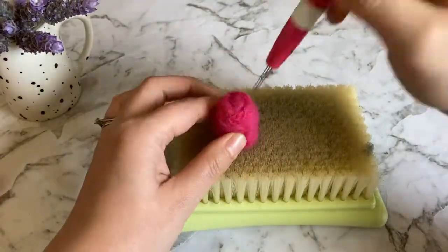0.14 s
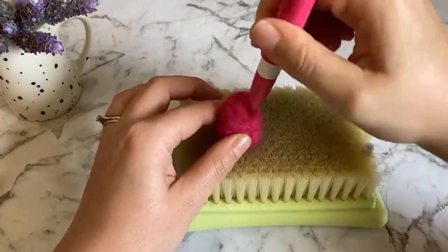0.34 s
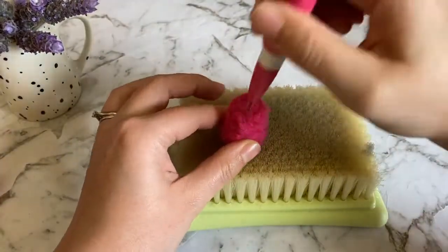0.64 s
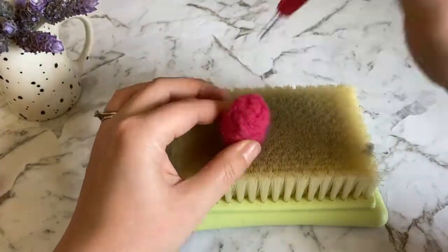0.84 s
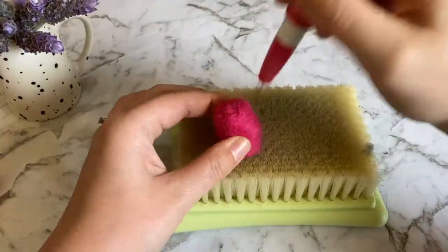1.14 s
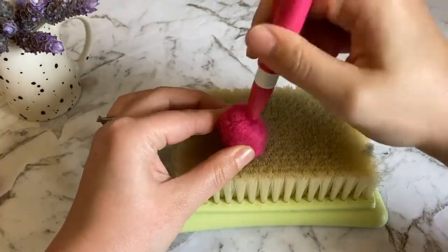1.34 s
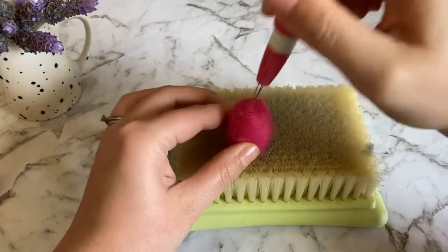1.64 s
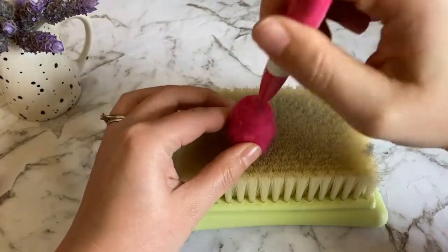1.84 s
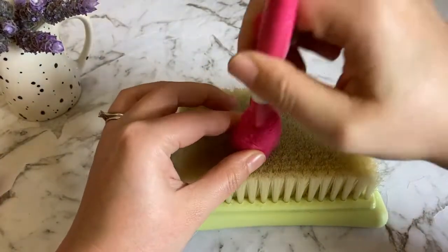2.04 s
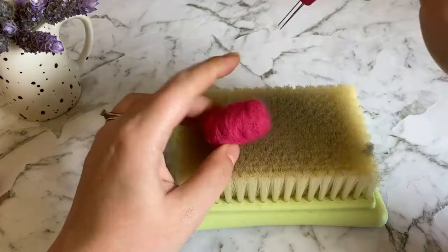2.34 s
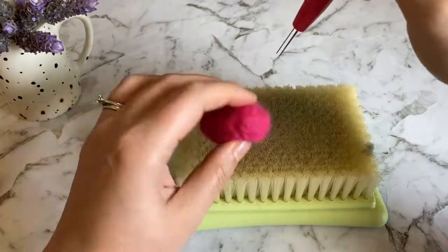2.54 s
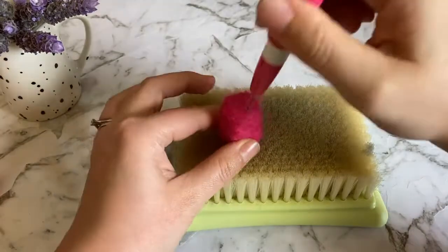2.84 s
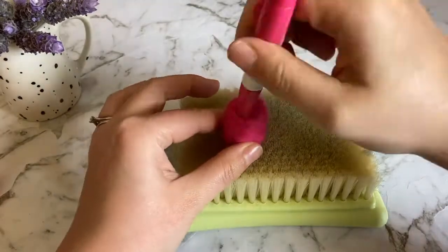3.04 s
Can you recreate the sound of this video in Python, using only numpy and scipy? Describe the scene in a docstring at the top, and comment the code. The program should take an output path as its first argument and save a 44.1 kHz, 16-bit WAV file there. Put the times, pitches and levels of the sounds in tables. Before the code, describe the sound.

Felting needles stab rapidly and evenly into a wool roll on a bristle mat, in three runs

```python
"""Fingers turn a roll of wool on a bristle mat with small rasps, and an arm leans on the table.
Then felting needles stab the roll about eleven times a second, in three runs with fingers between.
Each stab rasps through the fibres, rings the mat's modes and rocks the table; the withdrawal crackles.
Barbs tick as they let go, brushing swishes softly, and between the runs the table is knocked.
A close microphone feeds the left channel, over a wavering floor of noise and low table shaking."""
import sys
import numpy as np
from scipy import signal
from scipy.fft import rfft, irfft
from scipy.io import wavfile

SR = 44100
rng = np.random.default_rng(int(sys.argv[2]) if len(sys.argv) > 2 else 0)


def voltage_ratio(level):
    """Linear amplitude factor for a level in decibels (scalar or array-like)."""
    return 10 ** (np.asarray(level, float) / 20)


def store_wav(level_fs):
    """Save 16-bit WAV to argv[1]."""
    pcm = np.round(np.clip(np.atleast_2d(level_fs), -1, 1) * 32767)
    wavfile.write(sys.argv[1], SR, pcm.T.astype(np.int16))


N = 141120   # 3.2 s

# Levels in dB are those ahead of the microphone gain.
# Stabs of the needles. Each row: start in seconds, length in seconds, rasp level in dB, mat level in dB,
# crunch level in dB, share of the stroke at which the mat takes the push (0-1).
STROKES = [(0.261, 0.026, -47.5, -42.5, -62, 0.49), (0.3422, 0.03, -48.5, -38, -61, 0.36),
           (0.4196, 0.0382, -51, -45, -64.5, 0.67), (0.5223, 0.024, -46, -35, -67.5, 0.51),
           (0.6137, 0.026, -48.5, -44, -63, 0.69), (0.7012, 0.028, -49, -47, -77, 0.48),
           (0.79, 0.024, -52.5, -47, -76, 0.43), (0.876, 0.029, -51, -46.5, -68, 0.42),
           (1.258, 0.026, -52, -49, -63.5, 0.58), (1.352, 0.024, -48.5, -44.5, -63, 0.6),
           (1.4335, 0.026, -45, -46.5, -61, 0.51), (1.5179, 0.027, -45.5, -46, -62, 0.52),
           (1.606, 0.027, -47, -44, -57.5, 0.42), (1.6989, 0.025, -51.5, -49.5, -66, 0.67),
           (1.7853, 0.024, -47.5, -39, -62, 0.47), (1.8733, 0.031, -52, -42.5, -62, 0.64),
           (1.961, 0.029, -50.5, -43.5, -65, 0.53), (2.0487, 0.035, -52, -44.5, -69.5, 0.53),
           (2.142, 0.03, -49.5, -46, -67.5, 0.47), (2.874, 0.036, -50.5, -42, -59.5, 0.47),
           (2.9604, 0.031, -48.5, -45.5, -64.5, 0.58), (3.049, 0.025, -47.5, -45, -70.5, 0.47),
           (3.1344, 0.028, -47, -43.5, -65, 0.64)]
# Modes of the mat and table top. Each row: frequency in Hz, width in Hz, level in dB.
MAT_MODES = [(167.6, 26.3, -6), (319.5, 44.3, 2), (478, 71, -1), (556, 74, 0.5), (664, 120, -6.5),
             (833, 147, -18)]
# The packed wool's own resonances. Each row: frequency in Hz, width in Hz, level in dB.
WOOL_MODES = [(890, 220, -14), (1342, 220, 3.5), (1645, 380, -1), (2015, 227, -4)]
MAT_GRAINS_PER_S, MAT_SPREAD_DB = 1500, 2   # fibre snaps that drive the mat


def rms_one(x):
    """Scale to an rms of 1."""
    return x / np.sqrt(np.mean(x ** 2) + 1e-20)


def coloured(x, points):
    """Shape x by a spectrum of (Hz, dB) points joined over log frequency; rms 1."""
    hz = np.maximum(np.arange(N // 2 + 1) * SR / N, 1)
    f, db = np.transpose(points)
    gain = voltage_ratio(np.interp(np.log(hz), np.log(f), db))
    return rms_one(irfft(rfft(x) * gain, N))


def drift(rate_hz):
    """Slow chance: noise through two equal one-pole low-passes; rms 1."""
    r = np.exp(-2 * np.pi * rate_hz / SR)
    noise = rng.standard_normal(N + SR)
    return rms_one(signal.lfilter([1], [1, -2 * r, r * r], noise)[SR:])   # first second settles the filter


def band(lo_hz, hi_hz):
    """Noise between two edges; rms 1."""
    sos = signal.butter(2, [lo_hz, hi_hz], "band", fs=SR, output="sos")
    return rms_one(signal.sosfilt(sos, rng.standard_normal(N)))


def grains(per_s, spread_db):
    """Random fibre snaps of uneven size and either sign; rms 1."""
    size = voltage_ratio(spread_db * np.minimum(rng.exponential(1, N), 4)) * rng.choice([-1, 1], N)
    return rms_one(size * (rng.random(N) < per_s / SR))


def plateau(start, length, rise, fall):
    """Rise, hold, then an exponential fall (all in seconds)."""
    t = np.arange(N) / SR - start
    return np.clip(t / rise, 0, 1) ** 2 * np.exp(-np.clip(t - length + fall, 0, 1) / fall)


def hump(start, length, peak_at=0.52, sharpness=1):
    """One smooth push, highest at the share peak_at of its length."""
    u = np.clip((np.arange(N) / SR - start) / length, 0, 1)
    warped = u ** (np.log(0.5) / np.log(peak_at))
    return np.abs(np.sin(np.pi * warped)) ** sharpness


def resonate(force, modes):
    """Short, broad modes in parallel with alternating sign, each a two-pole resonance."""
    out = 0
    for k, (hz, width_hz, db) in enumerate(modes):
        r = np.exp(-np.pi * width_hz / SR)
        b = [(1 - r * r) / 2, 0, (r * r - 1) / 2]
        a = [1, -2 * r * np.cos(2 * np.pi * hz / SR), r * r]
        out = out + (-1) ** k * voltage_ratio(db) * signal.lfilter(b, a, force + 1e-18)
    return out


def mat(force):
    """The mat and table top ring under a force."""
    return resonate(force, MAT_MODES)


def room():
    """Steady background noise, strongest in the bass, whose level wavers."""
    # Spectrum of the background. Each row: frequency in Hz, level in dB.
    floor_spectrum = [(29, -2.5), (50, 2.5), (96, -12.5), (231, -19), (552, -23), (1040, -31), (1320, -36),
                      (4240, -43.5), (12900, -47), (15700, -48), (16300, -52)]
    return voltage_ratio(-60 + 2.6 * drift(24)) * coloured(rng.standard_normal(N), floor_spectrum)


def table_shake():
    """The table never quite rests: low-passed drift shakes it."""
    sos = signal.butter(3, 34.8, fs=SR, output="sos")   # low-pass in Hz
    return voltage_ratio(-49) * rms_one(signal.sosfilt(sos, drift(33)))


def fibre_rasp():
    """Dense fibre snaps with a rasping spectrum and flickering level."""
    # Spectrum of the rasp. Each row: frequency in Hz, level in dB per Hz.
    rasp_spectrum = [(590, 10.5), (1000, -6), (1970, -8), (2440, -15), (2710, -9.5), (5500, -8),
                     (7500, -5.5), (9000, -6.5), (12000, -8), (15200, -4.5), (15950, -15), (16500, -36)]
    return voltage_ratio(1.72 * drift(150)) * coloured(grains(10000, 4.5), rasp_spectrum)


def fibre_scrape():
    """Bright fibre scrapes that come and go: sparser snaps in narrow resonances."""
    # Resonances of the scrape. Each row: frequency in Hz, width in Hz, level in dB.
    scrape_modes = [(6420, 1120, -0.46), (7610, 620, -1.5)]
    level = voltage_ratio(-18 + 2.62 * drift(80))   # dB against the rasp
    return level * rms_one(resonate(grains(4000, 6.8), scrape_modes))


def fingers():
    """Fingers turn and press the roll on the bristles: rasp, with light snaps into mat and wool."""
    # Presses of the fingers. Each row: start in seconds, length in seconds, rasp level in dB, mat level in dB.
    presses = [(0.0, 0.06, -66.5, -53.5), (0.08, 0.038, -69, -60), (0.149, 0.039, -65.5, -51.5),
               (0.216, 0.023, -75, -60.5), (0.311, 0.071, -65, -54), (0.976, 0.061, -75.5, -62),
               (1.031, 0.031, -64, -55), (1.085, 0.021, -84, -62.5), (1.126, .025, -69.5, -59),
               (1.182, 0.054, -72.5, -61.5), (2.203, 0.029, -64, -59.5), (2.337, 0.019, -57.5, -48.5),
               (2.365, 0.019, -72.5, -92), (2.421, 0.012, -90, -60), (2.444, 0.055, -95, -61),
               (2.454, 0.018, -62, -59), (2.488, 0.019, -62, -57), (2.52, 0.015, -78, -60),
               (2.611, 0.035, -66, -56.5), (2.723, 0.021, -65, -51.5), (2.746, 0.02, -62, -50),
               (2.764, 0.035, -69, -59.5), (2.8, 0.084, -70.5, -76), (2.833, 0.02, -92, -54)]
    rasp = rub = 0
    for start, length, rasp_db, mat_db in presses:
        press = plateau(start, length, 0.0034, 0.0089)
        rasp = rasp + voltage_ratio(rasp_db) * press
        rub = rub + voltage_ratio(mat_db) * press
    # fingers push the mat too lightly to move its lowest modes
    light = signal.sosfilt(signal.butter(2, 404, "high", fs=SR, output="sos"), grains(900, 4.7))
    crunch_db = -23.5   # they also crunch the packed wool
    modes = MAT_MODES + [(hz, width, db + crunch_db) for hz, width, db in WOOL_MODES]
    body = resonate(rub * voltage_ratio(2.46 * drift(81)) * light, modes)
    body = body / np.std(mat(grains(MAT_GRAINS_PER_S, MAT_SPREAD_DB)))   # against the mat under steady snaps
    return rasp * (fibre_rasp() + fibre_scrape()) + body


def ticks():
    """Barbs let go of fibres: each tick is a tiny decaying noise burst in three bands."""
    # Ticks of the barbs. Each row: time in seconds, level in dB, low band and high band in dB against the middle.
    releases = [(0.0878, -48, 7.5, 5), (0.3461, -36, -8, -8), (0.3608, -31, -0.5, 4), (0.384, -37, -6, -6),
                (0.3937, -31.5, 3, 7), (0.4101, -37.5, 3.5, 12.5), (0.4269, -23, -5, -13),
                (0.4383, -37, 9, -6), (0.4882, -32, -19, -10), (0.56, -49, 15, -4), (0.5712, -29, -4, 5),
                (0.5793, -35, -1, -2), (0.616, -36.5, 9.5, 8), (0.6552, -43, 4.5, 5), (0.6634, -40.5, 5, 3),
                (0.6728, -25.5, -12, -19), (0.7556, -28, -5.5, 5.5), (0.8368, -37.5, -1.5, 2),
                (0.9262, -41, -7, -6), (0.9762, -49, -4, 2), (1.086, -52.5, 8, 10), (1.296, -39.5, -3, -1),
                (1.396, -44, -10, -4), (1.4067, -35.5, -14, -12), (1.475, -49, 3, -4), (1.552, -43, 4, -3),
                (1.567, -26, -10, -3), (1.5958, -58, -12, -15.5), (1.664, -39, -9, 3), (1.73, -50, 3, -1),
                (1.7471, -32.5, -2, -3), (1.8192, -49.5, 13.5, 13), (1.9365, -39, -6, -6),
                (2.023, -40, -4, 1), (2.1074, -36, -8, 0), (2.1914, -37, -1, 0), (2.925, -22.5, -20, -10),
                (2.9394, -51, -8, -7), (3.0128, -29.5, -2.5, 4), (3.0235, -55.5, 1, 8),
                (3.0462, -48, -15, 10), (3.1012, -42, 7, 7), (3.1132, -40, 3, 4), (3.1316, -38, 1, 2),
                (3.1934, -40, 5, 2)]
    # Edges of the three bands, in Hz.
    edges_hz = (2160, 6360, 8600, 15700)
    t60_s, rise_s = 0.0032, 0.00071
    bursts, t = np.zeros((3, N + 400)), np.arange(400) / SR
    shape = voltage_ratio(-60 * t / t60_s) * (1 - np.exp(-t / rise_s))
    for time, db, low_db, high_db in releases:
        i = int(time * SR)
        bursts[:, i:i + 400] += voltage_ratio(db + np.array([[low_db], [0], [high_db]])) * shape
    return 0.44 * sum(bursts[k, :N] * band(edges_hz[k], edges_hz[k + 1]) for k in range(3))


def leans():
    """The arm leans on the table: slow smooth pushes either way."""
    # Leans of the arm. Each row: start in seconds, level in dB, direction (1 or -1), length in seconds.
    arm_pushes = [(0.091, -28.5, 1, .03), (0.168, -30, -1, 0.022), (0.196, -26, -1, 0.016),
                  (0.212, -30, 1, 0.04), (0.277, -34, -1, 0.0346), (.385, -32, 1, 0.026)]
    return sum(voltage_ratio(db) * np.sign(way) * hump(start, length, sharpness=1.23)
               for start, db, way, length in arm_pushes)


def jolts():
    """The needles suddenly give and the mat takes single pushes."""
    # Jolts into the mat. Each row: time in seconds, size in dB against one ordinary snap.
    gives = [(0.278, 11.5), (0.3588, 17.5), (0.4355, 6.5), (0.443, 10), (0.5297, 9.5), (0.5343, 13),
             (0.5383, 12.5), (0.6206, 6.5), (0.631, 9.5), (0.7103, 7.5), (0.885, 3), (1.368, 12),
             (1.4526, 7.5), (1.525, 3.5), (1.6182, 5.5), (1.707, 3.5), (1.7988, 12.5), (1.8857, 6.5),
             (1.9757, 10), (2.061, 4), (2.8876, 7.5), (2.976, 11), (3.061, 9)]
    out = np.zeros(N)
    for time, db in gives:
        out[int(time * SR)] = -voltage_ratio(db) * np.sqrt(SR / MAT_GRAINS_PER_S)
    return out


def struck(force, modes, start, length, db):
    """Ringing from one stroke's start over 0.14 s, its energy set by level and stroke length."""
    out, part = np.zeros(N), slice(int(start * SR), int((start + 0.14) * SR))
    ring = resonate(force[part], modes)
    out[part] = voltage_ratio(db) * ring * np.sqrt(length * SR / np.sum(ring ** 2))
    return out


def stabs():
    """Needles rasp in, drive mat and packed wool with snaps and jolts, then crackle on withdrawal."""
    # One row a stab: level of each of the mat's six modes, lowest first, in dB against the stab's mat level.
    mode_shares = [(-13, -1, -5, -6, -9, -17), (-15, -9.5, -2, -1.5, -10, -27),
                   (-3, -5.5, -3.5, -4, -12.5, -36), (-11.5, -5, -4, -4.5, -9.5, -31),
                   (-9.5, -8, -9.5, -3, -7, -13.5), (-10, -12, -4, -7, -9, -11),
                   (-3.5, -1, -5, -9, -7, -40), (-11, -3, -9, -11, -15, -15.5),
                   (-13.5, -8.5, -4, -7.5, -14, -19), (-11.5, -7, -2, -4, -21, -13.5),
                   (-13, -11, -13, -2.5, -6, -8), (-20, -5.5, -10, -6.5, -4.5, -16),
                   (-5.5, -5.5, -3, -8, -13.5, -24), (-9, -6.5, -4, -1, -10, -13.5),
                   (-12.5, -5, -12, -7, -8.5, -14), (-11, -11, -4.5, -9.5, -15.5, -11.5),
                   (-9, -1.5, -16.5, -12.5, -7.5, -26), (-6.5, -6, -8, -7.5, -12, -19),
                   (-11, -5, -5, -7.5, -9.5, -10.5), (-18.5, -4.5, -4, -3, -5.5, -19.5),
                   (-20, -12, -3.5, 1, -18, -27), (-8, -7, -14, -10, -2, -12),
                   (-17, -7, -7.5, -4, -4.5, -11.5)]
    # Spectrum of the withdrawal's crackle. Each row: frequency in Hz, level in dB per Hz.
    pull_spectrum = [(590, -31), (1000, 1), (2100, -5.5), (4500, -8), (7000, 0), (10000, -6.5), (15600, -1),
                     (16300, -11)]
    pull_after_s, pull_s = 0.0034, 0.033
    pull_db, pull_mat_db = -20.5, -23.5   # withdrawal, against the stab
    rasp = pulls = body = 0
    force = grains(MAT_GRAINS_PER_S, MAT_SPREAD_DB)
    snaps = grains(1500, 3.5)
    jolt = jolts()
    for (start, length, rasp_db, mat_db, crunch_db, peak_at), shares in zip(STROKES, mode_shares):
        pull = hump(start + length + pull_after_s, pull_s, sharpness=0.5)
        push = hump(start, length, peak_at, 1.19)
        rasp = rasp + voltage_ratio(rasp_db) * hump(start, length, 0.46)
        pulls = pulls + voltage_ratio(rasp_db + pull_db) * pull
        load = force * (push + voltage_ratio(pull_mat_db) * pull) + jolt
        for k, mode in enumerate(MAT_MODES):
            body = body + (-1) ** k * struck(load, [mode], start, length, mat_db + shares[k])
        wool_load = snaps * push + voltage_ratio(-2.5) * jolt
        body = body + struck(wool_load, WOOL_MODES, start, length, crunch_db)
    scrape = fibre_scrape()
    crackle = voltage_ratio(2.0 * drift(110)) * coloured(grains(11000, 6.2), pull_spectrum)
    return rasp * (fibre_rasp() + scrape) + pulls * (crackle + scrape) + body


def table_rock():
    """Each stab pushes the table just after it starts, and slow decaying modes rock."""
    # Rocking modes of the table. Each row: frequency in Hz, level in dB, 60 dB decay time in seconds.
    rock_modes = [(12.23, -1, 0.31), (23.1, -6, 0.026), (32.7, 2, 0.21), (71, -8.5, 0.14), (103, -5, 0.046)]
    follows = 0.084   # share of the mat's level swing, in dB, that the push follows
    push = sum(voltage_ratio(follows * (mat_db + 49)) * hump(start + 0.0035, 0.012)
               for start, _, _, mat_db, _, _ in STROKES)
    rock = 0
    for hz, db, t60_s in rock_modes:
        r, w = voltage_ratio(-60 / (t60_s * SR)), 2 * np.pi * hz / SR
        a = [1, -2 * r * np.cos(w), r * r]
        rock = rock + voltage_ratio(db) * signal.lfilter([0, np.sin(w)], a, push - push.mean())
    return voltage_ratio(-42) * rock / (0.0053 * SR)


def swish():
    """A hand or sleeve brushes softly: a bright, narrow hiss."""
    # Brushes. Each row: start in seconds, length in seconds, level in dB.
    brushes = [(0.305, 0.046, -78), (1.178, 0.15, -80), (2.342, 0.077, -76), (2.704, 0.25, -80.5)]
    centre_hz, width_hz = 8600, 2000
    level = sum(voltage_ratio(db) * hump(start, length, sharpness=0.21) for start, length, db in brushes)
    return level * band(centre_hz - width_hz / 2, centre_hz + width_hz / 2)


def knocks():
    """Soft knocks on the table: a push with an opposite recoil before it, ringing the mat too."""
    # Knocks. Each row: time in seconds, level in dB, direction (1 or -1), contact in seconds, recoil share (0-1).
    contacts = [(1.012, -38, 1, 0.0026, 0.04), (1.152, -50.5, 1, 0.0052, 0.8),
                (2.316, -31.5, 1, 0.0028, 0.05), (2.468, -39, -1, 0.0041, 0.03),
                (2.547, -42.5, 1, 0.0071, 0.1), (2.7, -48, 1, 0.0058, 0.2), (2.736, -39.5, -1, 0.0013, 0.9)]
    knock = 0
    for start, db, way, contact, recoil in contacts:
        push = hump(start, contact, sharpness=2.07)
        push = push - recoil * hump(start - contact, contact, sharpness=0.5)
        knock = knock + voltage_ratio(db) * np.sign(way) * push
    return knock + 0.49 * mat(knock)


def scene():
    """All the sounds at the microphone on the left; nothing on the right."""
    wool = fingers() + ticks() + stabs() + swish()
    table = table_shake() + leans() + table_rock() + knocks()
    return np.array([wool + table + room(), np.zeros(N)])


def top_cut(x):
    """Nothing passes above the cut-off."""
    return signal.sosfilt(signal.butter(12, 16670, fs=SR, output="sos"), x)


def record(dry):
    """The microphone channel loses its top and its lowest rumble, then gains 6 dB."""
    low_pass = signal.cheby2(12, 40, 16600, fs=SR, output="sos")   # 40 dB down from 16600 Hz
    high_pass = signal.butter(1, 5, "high", fs=SR, output="sos")
    heard = signal.sosfilt(high_pass, signal.sosfilt(low_pass, dry))
    return top_cut(heard * voltage_ratio(6))


dry = scene()
out = record(dry)
store_wav(out)
```